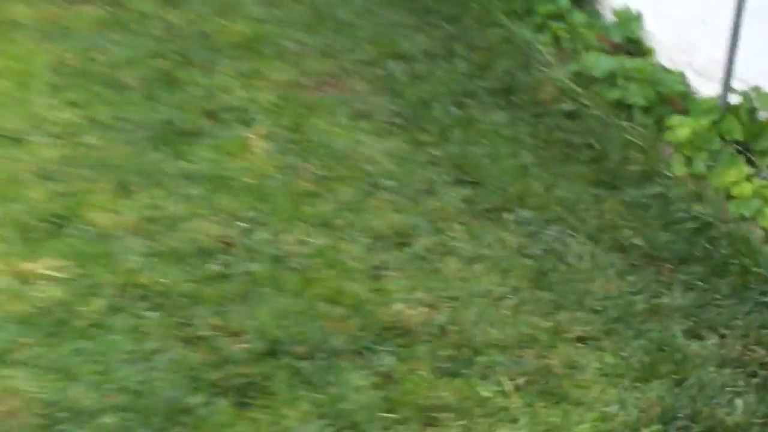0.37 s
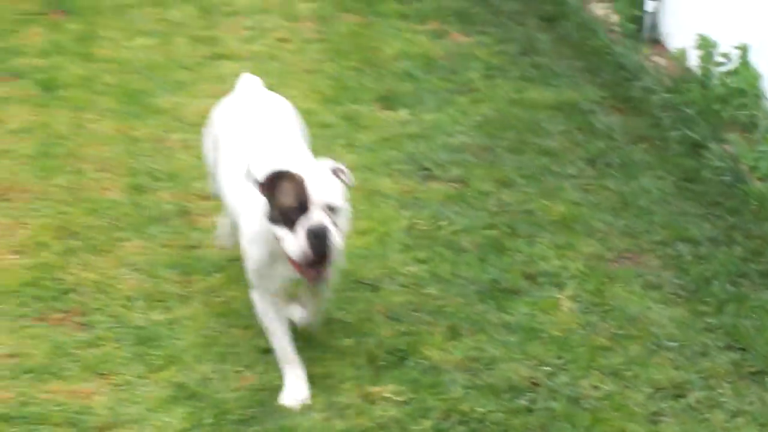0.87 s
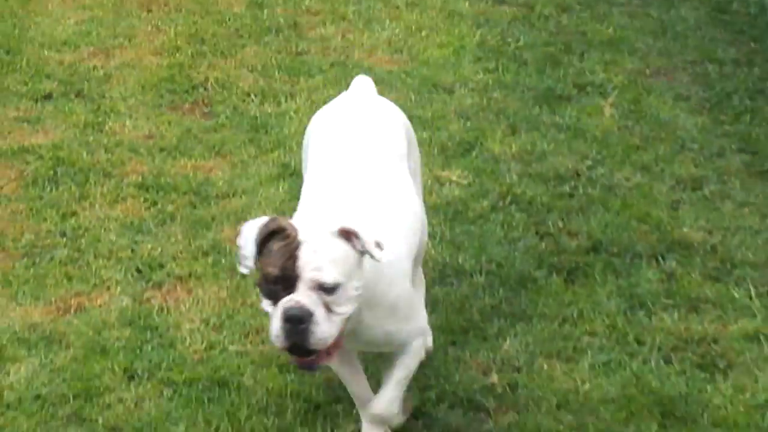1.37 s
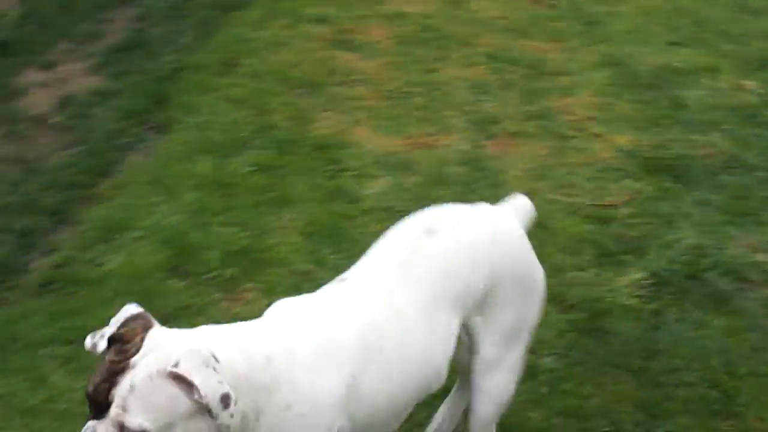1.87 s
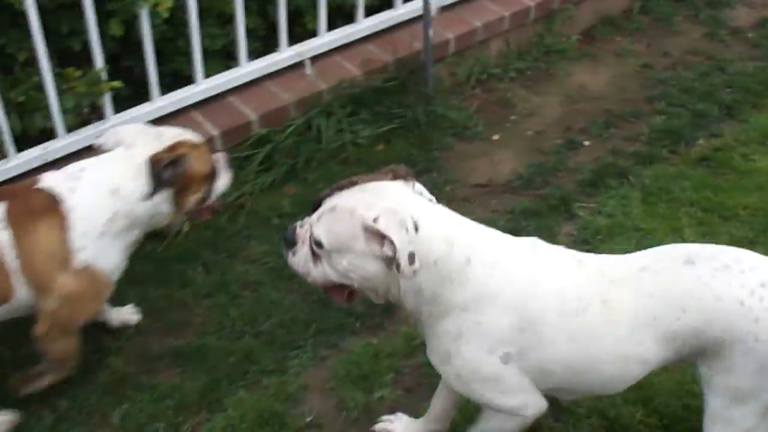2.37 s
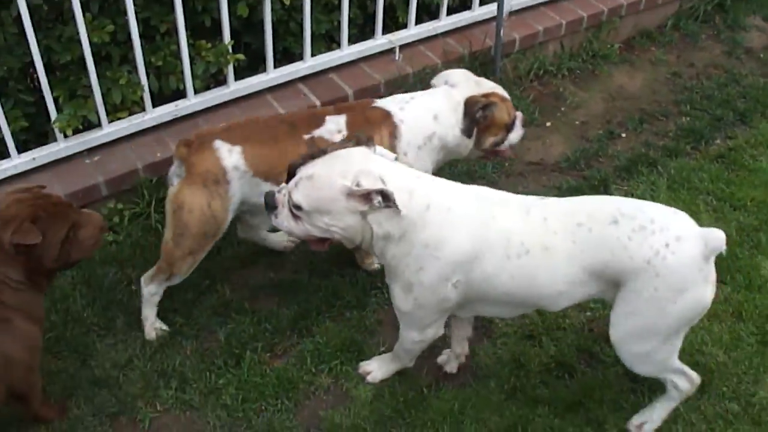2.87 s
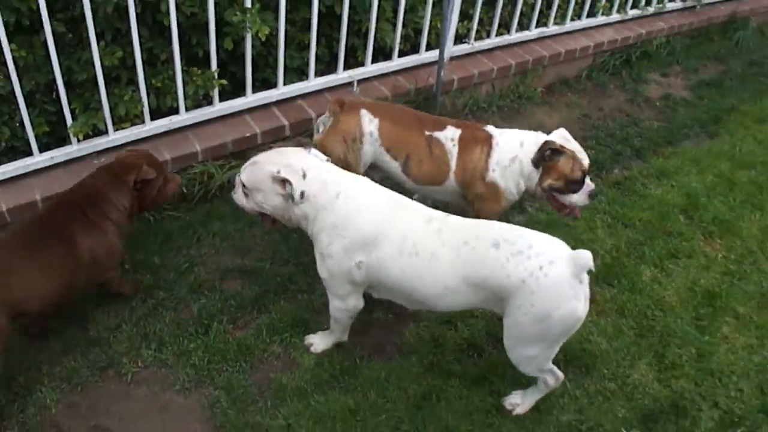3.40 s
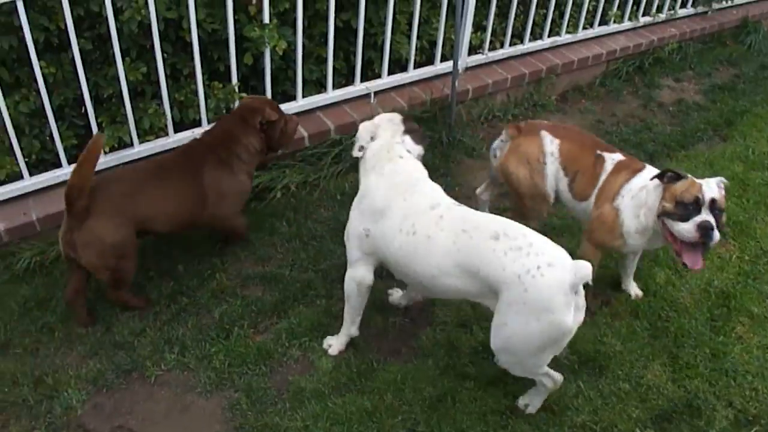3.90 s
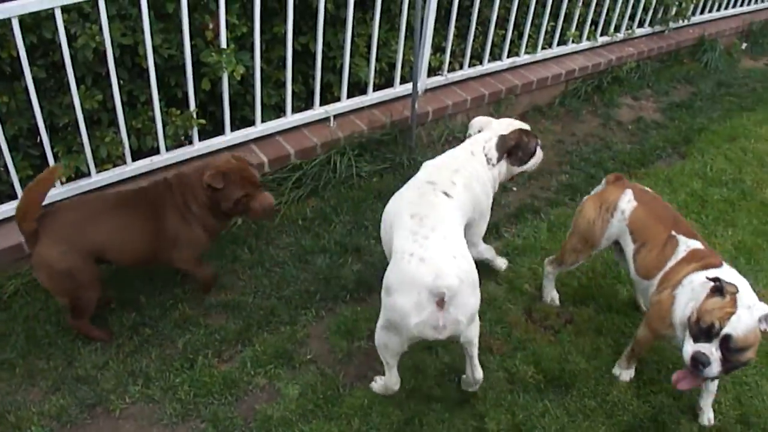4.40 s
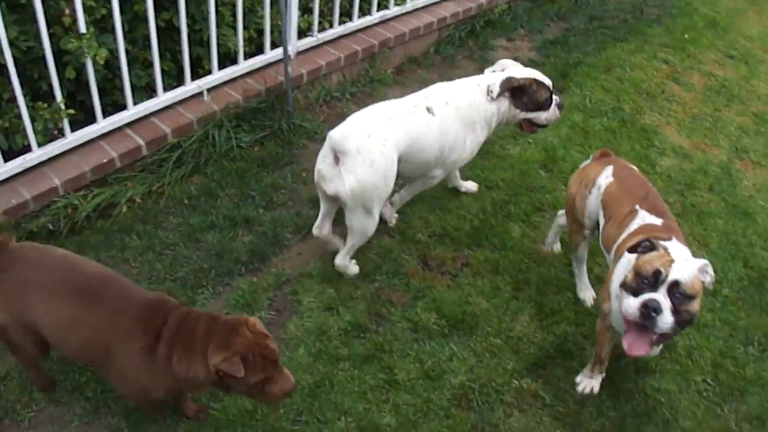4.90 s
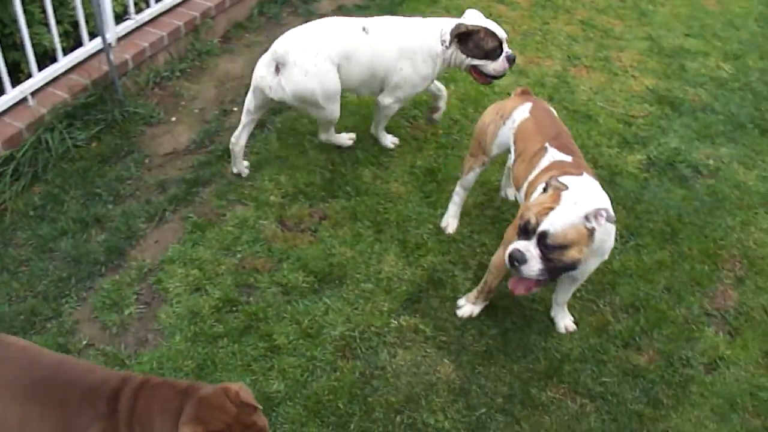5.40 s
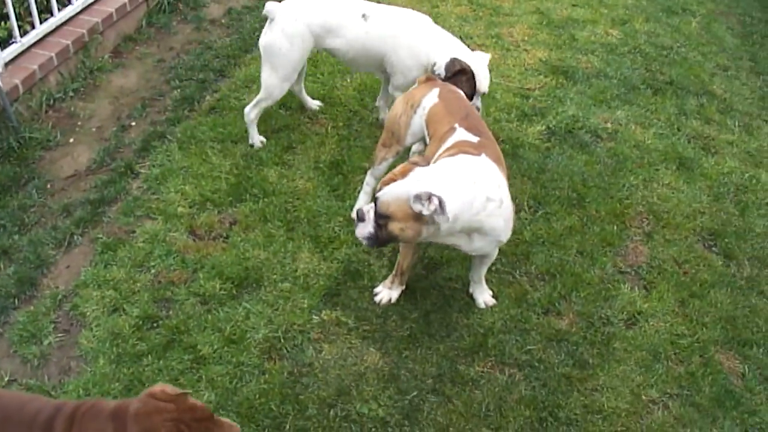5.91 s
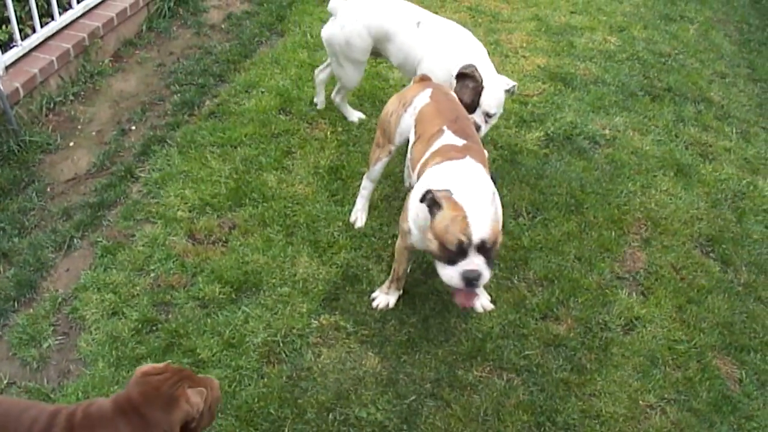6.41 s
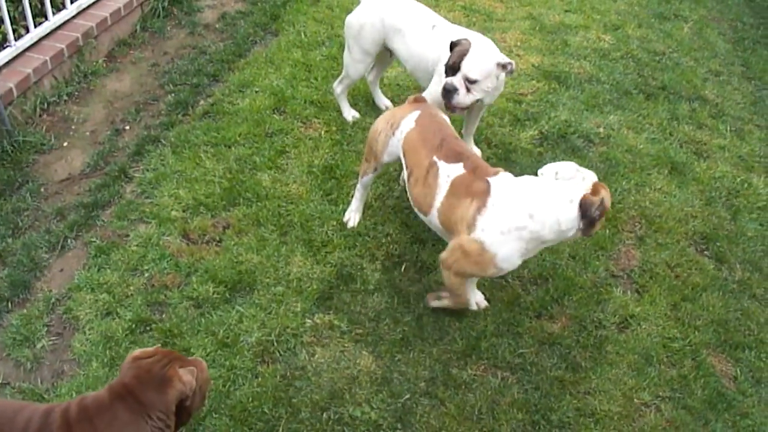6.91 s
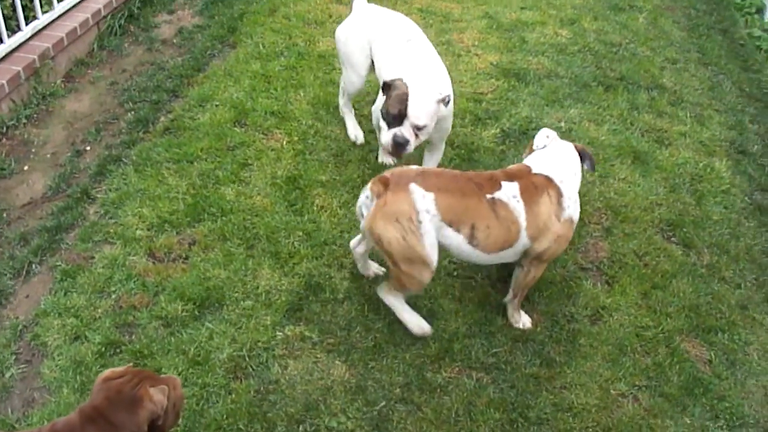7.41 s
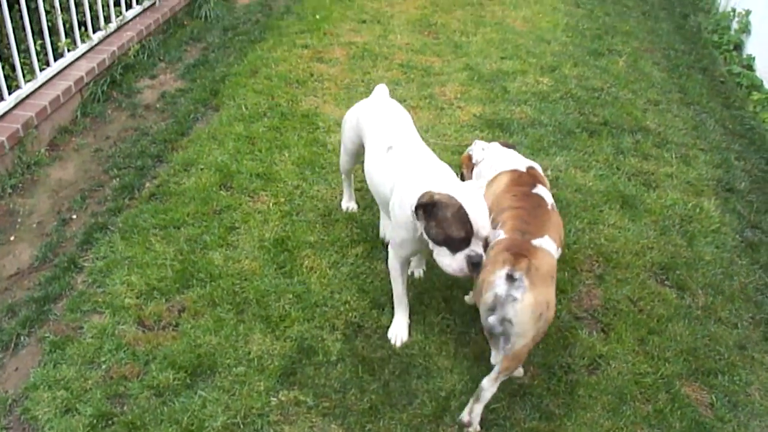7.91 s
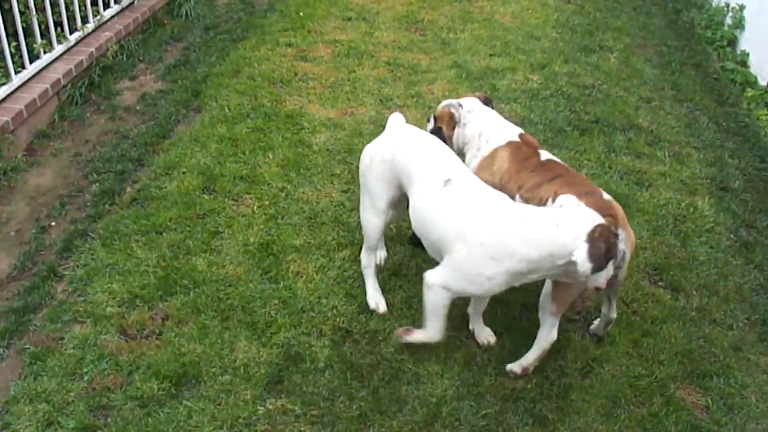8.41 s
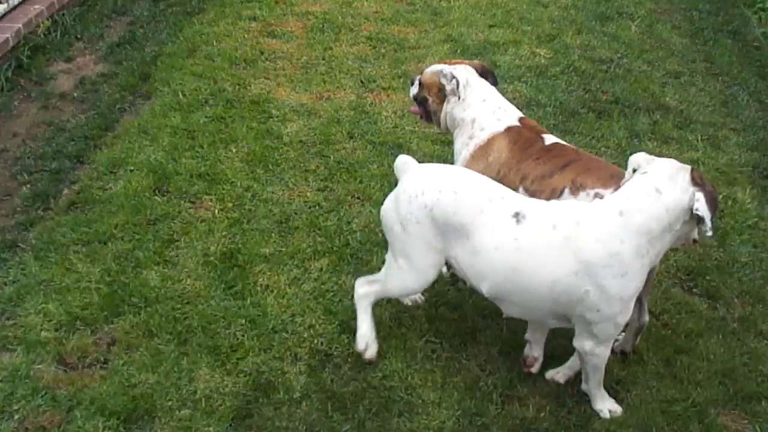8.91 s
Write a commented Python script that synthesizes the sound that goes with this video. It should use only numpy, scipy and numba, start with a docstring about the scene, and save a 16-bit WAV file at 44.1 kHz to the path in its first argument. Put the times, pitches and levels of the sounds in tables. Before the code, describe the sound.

On a backyard lawn, a small camera's microphone hears mostly its own handling. From 0 to 0.35 s, rapid bright focus ticks mix with skin rubs and bumps; a hard tap and thump land near 0.42. At 0.36 the zoom motor lurches in with a bending whine, settling into a rough, pulsing grind until 4.17. Irregular thumps punctuate it, densest around 2.6-3.1. Scrapes and taps at 4.2-4.4 follow its stop. Faint steady hiss and fast ticking with dull knocks remain until 6.8, while dogs pant a few metres away in short raspy puffs, mainly 4.3-5.5 and again at 6.5. Isolated bumps fall near 4.8 and 5.7. A very faint high whirr spans 6.8-7.5, then sharp taps, rubs and heavy bumps cluster at 7.5-8.0. The motor restarts at 8.05 and grinds to the 9-second end. Loud hits briefly duck the background.

```python
"""First a faint outdoor hiss, skin rubbing a small hand-held camera and its focus drive ticking once a field.
Fingers bump and tap the case, and a zoom motor runs twice: steps slap its gears, which grind and whine.
Later, dogs on a lawn pant a few metres off: shaped noise that swells and dies with each breath.
Bumps are short pushes on the diaphragm, taps are ringing modes, rubs are stuttering noise.
A limiter ducks all of it after each loud peak."""
import sys
import numpy as np
from scipy import signal
from scipy.fft import rfft, irfft
from scipy.io import wavfile
from scipy.ndimage import uniform_filter1d
from numba import njit

SR = 44100
rng = np.random.default_rng(int(sys.argv[2]) if len(sys.argv) > 2 else 0)


def generate_wav(sig):
    """Save sig (samples, or channels by samples) to the path in sys.argv[1] as 16-bit PCM at SR."""
    pcm = np.round(np.clip(np.atleast_2d(sig).T, -1, 1) * 32767).astype(np.int16)
    wavfile.write(sys.argv[1], SR, pcm)


def attenuation_scalar(level_db):
    """Turn a level in dB into a linear amplitude multiplier (20 dB per decade)."""
    decades = np.asarray(level_db, float) / 20
    return 10 ** decades


N = 398223
T = np.arange(N) / SR
FIELD_HZ = 59.94  # picture fields per second; they pace the focus drive


def unit(x):
    """Scale to rms 1."""
    return x / np.sqrt(np.mean(x ** 2))


def noise():
    """White noise of rms 1."""
    return rng.standard_normal(N)


def colour(x, points):
    """Causal (minimum-phase) filter whose gain follows (frequency [Hz], gain [dB]) points."""
    hz, db = np.transpose(points)
    grid_hz = np.arange(2049) * SR / 4096
    gain_db = np.interp(np.log(grid_hz + 1), np.log(hz), db)
    cepstrum = irfft(gain_db * np.log(10) / 20)
    # folding the cepstrum forward in time makes the filter causal
    cepstrum[1:2048] *= 2
    cepstrum[2049:] = 0
    return signal.fftconvolve(x, irfft(np.exp(rfft(cepstrum))))[:len(x)]


def ring(x, modes):
    """Decaying sine modes struck by x, each falling 60 dB in its own time."""
    t = T[:4096]
    response = sum(attenuation_scalar(db) * np.sin(2 * np.pi * hz * t) * .001 ** (t / t60) for hz, db, t60 in modes)
    return signal.fftconvolve(x, response)[:N]


def blows(times, sizes):
    """Single-sample blows."""
    return np.bincount(np.clip((times * SR).astype(int), 0, N - 1), sizes, N)


def walk(rate):
    """Smooth chance that turns about rate times a second, spread 1."""
    k = int(SR / rate)
    once = uniform_filter1d(noise(), k, mode="wrap")
    return unit(uniform_filter1d(once, k, mode="wrap"))


def tone(hz):
    """Sine of rms 1 on a moving pitch."""
    return np.sqrt(2) * np.sin(2 * np.pi * np.cumsum(hz) / SR)


def burst(x, seconds):
    """Every blow starts a tail that dies away exponentially."""
    return signal.lfilter([1], [1, -np.exp(-1 / (seconds * SR))], x)


def cut(x, hz, kind):
    """Steep filter: "low" keeps what lies below hz, "high" what lies above."""
    return signal.sosfilt(signal.butter(4, hz, kind, fs=SR, output="sos"), x)


def span(start, stop):
    """A gate that is open from start to stop, with edges smoothed over 90 samples."""
    return uniform_filter1d(1. * ((T >= start) & (T <= stop)), size=90)


# tone colour of the steady hiss: (frequency [Hz], gain [dB])
AIR_COLOUR = [(20, 1), (70, 3.5), (360, -5), (760, -8.5), (1040, -4), (1340, -0.5), (1550, 4), (1960, -0.5),
              (3200, -13.5), (4000, -12), (4600, -16), (7400, -30.5), (11000, -54.5)]


def air():
    """Steady hiss of air and electronics: shaped noise."""
    return attenuation_scalar(-47.5) * unit(colour(noise(), AIR_COLOUR))


# low handling rumble before its wandering is added: (time [s], level [dB])
RUMBLE_LEVEL = [(0, -61), (4.3, -56.5), (5, -66), (7.9, -64), (8.4, -74)]


def handling_rumble():
    """Low handling rumble: deep noise whose level wanders, louder while the hand moves."""
    level_db = np.interp(T, *np.transpose(RUMBLE_LEVEL)) + 6.7 * walk(13.4)
    deep = colour(noise(), [(20, -16.5), (60, 2), (130, -6.5), (300, -35), (1500, -120)])
    return attenuation_scalar(level_db) * unit(deep)


# skin slides on the case: (start [s], hardest press [s], stop [s])
RUB_TIMES = [(0, .04, .09), (.13, .185, .197), (.355, .375, .41), (.42, .43, .49), (2.625, 2.695, 2.725),
             (2.74, 2.79, 2.86), (4.2, 4.262, 4.3), (4.305, 4.322, 4.336), (6.63, 6.67, 6.72),
             (6.75, 6.83, 6.86), (7.57, 7.595, 7.612), (7.614, 7.632, 7.642), (7.826, 7.85, 7.892)]
# how each slide sounds at its hardest: (level [dB], treble against body [dB], low crackle against body [dB])
RUB_LEVELS = [(-33.5, -21, -25), (-25, -3, -2.5), (-20, -29, -2), (-20.5, -23, -2), (-41, -27, 21),
              (-39.5, -31, 20), (-25, -19.5, -1.5), (-18, -34, -3), (-44, 2, 2.5), (-42.5, 2.5, 3),
              (-39, -15, -0.5), (-18.5, 0.5, -11), (-29, -3, -7)]
# tone colour of a slide's body, treble and low crackle: (frequency [Hz], gain [dB])
RUB_BODY_COLOUR = [(400, -15), (750, 1), (1150, 2), (1650, 13), (2000, 6), (2600, -3.5), (3800, -8),
                   (5000, -23), (8000, -71)]
TREBLE_COLOUR = [(1800, -48), (2400, 1), (4200, -1), (6000, -11.5), (9200, -28), (11000, -32)]
RUB_LOW_COLOUR = [(40, -5.5), (150, 6), (500, 7), (800, -1), (1300, -15), (4000, -100)]


def rubs():
    """Skin stutters along the case: gritty noise that grows with the press of the finger."""
    touch_db, lift_db, trail_db = -14, -6, -11.5  # softer at both ends, then a faint trail
    trail_s = .025
    grit = attenuation_scalar(3.0 * walk(400) + 1.5 * walk(60))
    body = unit(colour(noise() * grit, RUB_BODY_COLOUR))
    treble = unit(colour(noise() * grit, TREBLE_COLOUR))
    crackle = attenuation_scalar(1.5 * walk(130) + 1.9 * walk(50))
    low = unit(colour(noise() * crackle, RUB_LOW_COLOUR))
    out = np.zeros(N)
    for (start, peak, stop), (db, treble_db, low_db) in zip(RUB_TIMES, RUB_LEVELS):
        press_s = [start, peak, stop, stop + trail_s / 5, stop + trail_s]
        press_db = np.interp(T, press_s, [touch_db, 0, lift_db, trail_db, 2 * trail_db])
        skin = body + attenuation_scalar(treble_db) * treble + attenuation_scalar(low_db) * low
        out += span(start, stop + trail_s) * attenuation_scalar(db + press_db) * skin
    return out


# the focus drive hunts back and forth: (start [s], stop [s], blow level [dB], extra as it sets off [dB])
HUNTS = [(0, .34, -26.5, -14), (4.383, 6.837, -33.5, 1), (7.52, 8.05, -33, 9.5)]
# ringing of a bright tick and of a dull knock: (frequency [Hz], level [dB], time to fall 60 dB [s])
TICK_RING = [(3992, -9, 0.034), (4364, -4.5, 0.016), (5120, 2.5, 0.0049), (5450, -6.5, 0.0065),
             (6300, -15, 0.0045), (1800, -2, 0.02)]
KNOCK_RING = [(371, 1.5, 0.046), (1023, -16, 0.026), (1465, 10.5, 0.012)]
TRAVEL_START_S, TRAVEL_STOP_S = 6.81, 7.53  # the drive's long fast travel; the idle ticks pause


def focus_ticks():
    """A bright tick each field, every second one harder; in the long hunt those bring a dull knock."""
    first_tick_s, knock_lag_s, set_off_s = .0052, .005, 0.14
    idle_db, knock_db = -46.5, -44.5
    times = first_tick_s + np.arange(int(N / SR * FIELD_HZ)) / FIELD_HZ
    tick_chance, knock_chance, time_chance = rng.standard_normal((len(times), 3)).T
    hard = np.arange(len(times)) % 2
    force = attenuation_scalar(idle_db) * ((times < TRAVEL_START_S) | (times > TRAVEL_STOP_S))
    for start, stop, db, extra_db in HUNTS:
        setting_off = np.exp(-np.abs(times - start) / set_off_s)
        force = force + ((times >= start) & (times <= stop)) * attenuation_scalar(db + extra_db * setting_off)
    sizes = force * attenuation_scalar(-3.5 * (3.0 - hard) + 2.5 * tick_chance)
    ticks = blows(times + .00008 * time_chance, sizes)
    # a short rattle, then the drive rustles on until the next field
    rattle = (.3 * burst(ticks, .0004) + .03 * burst(ticks, .012)) * noise()
    bright = ring(cut(ticks + rattle, 5780, "low"), TICK_RING)
    knock_times = times + knock_lag_s * (1 + 0.059 * time_chance)
    knocks = span(4.42, 6.8) * attenuation_scalar(knock_db) * blows(knock_times, hard * attenuation_scalar(4.2 * knock_chance))
    return bright + ring(cut(knocks, 2400, "low"), KNOCK_RING)


# fingers bump the case: (time [s], level [dB], width of the main push [ms], direction [+1 or -1])
BUMP_EVENTS = [(0.0192, -16.5, 4.1, -1.0), (0.079, -15.5, 3.7, -1.0), (0.187, -7.5, 1.43, 1.0),
               (0.4327, -3, 1.3, 1.0), (0.7735, -13, 4.9, -1.0), (1.0046, -20, 1.1, 1.0),
               (1.087, -15.5, 1.04, 1.0), (1.286, -8, 2.4, 1.0), (1.3233, -12.5, 4.4, 1.0),
               (1.5283, -6.5, 2.2, 1.0), (1.695, -14, 2.24, 1.0), (1.792, -23, 2, -1.0),
               (1.8143, -21, 2.7, -1.0), (1.9307, -17.5, 1.8, -1.0), (1.9798, -20, 1.8, 1.0),
               (2.0077, -21, 1.6, 1.0), (2.0599, -16.5, 1.4, 1.0), (2.154, -15.5, 1.8, 1.0),
               (2.604, -15.5, 3.7, -1.0), (2.621, -7, 1.35, -1.0), (2.646, -4, 4.2, -1.0),
               (2.8804, -7, 2.55, -1.0), (2.9338, -8.5, 3.3, -1.0), (2.9612, -15, 2.7, 1.0),
               (3.007, -11.5, 3.1, -1.0), (3.0294, -8.5, 3.05, -1.0), (3.054, -6.5, 2.8, -1.0),
               (3.2113, -19, 1.8, -1.0), (3.2977, -26, 5, -1.0), (3.4577, -10.5, 3.6, -1.0),
               (3.512, -20.5, 2.3, -1.0), (3.6913, -24, 4.2, -1.0), (3.748, -22, 3.6, -1.0),
               (3.7665, -13.5, 2.95, -1.0), (3.8097, -25, 3, -1.0), (3.9315, -12, 2.9, -1.0),
               (4.0384, -13, 3.5, -1.0), (4.4065, -20, 5.3, 1.0), (4.8267, -10, 2.6, 1.0),
               (4.8873, -17, 3.5, 1.0), (5.7257, -7.5, 2.1, 1.0), (6.511, -19.5, 2.9, 1.0),
               (6.5184, -15.5, 2.6, 1.0), (6.8438, -18, 1.6, -1.0), (6.974, -39, 3, 1.0),
               (7.361, -32, 4, 1.0), (7.658, -7.5, 3, -1.0), (7.5196, -22.5, 3.8, -1.0),
               (7.698, -7, 2.6, -1.0), (7.8918, -15.5, 1.77, -1.0), (7.923, -22.5, 5.1, 1.0),
               (7.9678, -12.5, 2.8, 1.0), (7.9908, -14, 4.5, 1.0), (8.021, -25, 4.0, 1.0),
               (8.0716, -24, 5.2, 1.0), (8.59, -20.5, 1.45, -1.0)]


def bumps():
    """Each bump pushes the diaphragm and lets it swing back."""
    out = np.zeros(N)
    for s, db, ms, way in BUMP_EVENTS:
        at = np.flatnonzero(np.abs(T - s) < ms / 200)
        u = (T[at] - s) * 2000 / ms  # time in half widths
        swing = (1 - u ** 2) * np.exp(-u ** 2 / 2)
        # the contact itself: steep rise, slower fall
        tip = np.clip(1 - np.abs(u) / np.where(u < 0, .4, .9), 0, 1)
        out[at] += np.sign(way) * attenuation_scalar(db) * (0.56 * swing + 0.54 * tip)
    return out


# taps and creaks of the case: (time [s], blow level [dB], treble against the blow [dB])
TAP_EVENTS = [(0.0997, -35.5, 16), (0.1165, -17.5, -35), (0.186, -16.5, -4), (0.3557, -15, -100),
              (0.4156, -4.5, -25), (0.9194, -24, -21), (1.529, -24.5, -28), (1.5905, -31, -29),
              (2.6173, -20, -46), (4.2435, -20.5, -23), (4.291, -15.5, -20), (4.3203, -10, -27),
              (4.367, -30, -13), (4.393, -32, -12), (5.139, -30.5, -14), (5.3197, -31, -2), (6.828, -33, 3),
              (7.5281, -32, 8), (7.5913, -36, -21), (7.621, -19, -15), (7.636, -3, -1), (7.728, -29, -1),
              (7.768, -31.5, 6.5), (7.793, -33.5, 8), (7.8495, -29.5, -52), (7.9702, -17, -12),
              (8.0463, -25, -18), (8.545, -23.5, -17)]
# ringing of the case and of a tap's bright part: (frequency [Hz], level [dB], time to fall 60 dB [s])
TAP_RING = [(1593, 6.5, 0.0094), (1750, -24, 0.0044), (1188, -9, 0.011), (695, -22, 0.06)]
SNAP_RING = [(2750, -3.5, 0.016)]


def taps():
    """Short blows ring the case; a bright mode and a snap of noise add the treble."""
    s, db, treble_db = np.transpose(TAP_EVENTS)
    case_ring = ring(cut(blows(s, attenuation_scalar(db)), 2730, "low"), TAP_RING)
    bright_blows = blows(s, attenuation_scalar(db + treble_db))
    snap = burst(bright_blows, 0.00088) * noise()
    filter_gain = np.std(colour(noise(), TREBLE_COLOUR))
    return case_ring + ring(bright_blows, SNAP_RING) + 1.96 * colour(snap, TREBLE_COLOUR) / filter_gain


# the focus drive sings while it travels: (start [s], length [fields], pitch [Hz], level [dB])
FOCUS_BEEPS = [(.272, 1.1, 5700, -58), (.307, 1.2, 5800, -59), (5.08, 1.2, 3820, -52),
               (5.155, 2.3, 3800, -56), (5.778, 1.2, 4400, -56), (6.362, 1.1, 5750, -52),
               (6.378, 1.1, 4750, -56), (6.412, 1, 3760, -58), (6.428, 1.1, 5760, -53),
               (6.762, 1.3, 5840, -55), (6.795, 0.99, 3900, -46), (7.563, 1.1, 4800, -56)]
# one longer buzz with overtones: (start [s], stop [s], base pitch [Hz])
FOCUS_BUZZ = (7.642, 7.693, 748)
# the long fast travel: (base pitch [Hz], pitch spread [Hz], middle level [dB])
FAST_TRAVEL = (8050, 1250, -69.5)


def focus_tones():
    """Thin tones of the travelling drive: steady beeps, a fast high travel and a fading buzz."""
    flutter = attenuation_scalar(1.6 * walk(300))
    out = np.zeros(N)
    for s, fields, hz, db in FOCUS_BEEPS:
        out += span(s, s + fields / FIELD_HZ) * attenuation_scalar(db) * flutter * tone(np.full(N, 1. * hz))
    low_hz, spread_hz, travel_db = FAST_TRAVEL
    done = np.clip((T - TRAVEL_START_S) / (TRAVEL_STOP_S - TRAVEL_START_S), 0, 1)
    arch = np.abs(np.sin(np.pi * done)) ** .3  # fastest half way
    # the speed sags once every two fields and wanders besides
    swing = .6 + .35 * np.sin(np.pi * FIELD_HZ * T + 2.6) + .1 * walk(90)
    size = attenuation_scalar(travel_db + 3.0 * walk(60)) * walk(500)
    out += span(TRAVEL_START_S, TRAVEL_STOP_S) * size * tone(low_hz + spread_hz * arch * swing)
    start, stop, base_hz = FOCUS_BUZZ
    fade_db = 260 * np.abs(T - start)  # 260 dB per second
    for multiple, db in zip([2., 3., 4., 5.], [-30, -37, -33, -28]):
        out += span(start, stop) * attenuation_scalar(db - fade_db) * flutter * tone(np.full(N, multiple * base_hz))
    return out


# zoom motor runs: (start [s], stop [s], level [dB], extra while it starts [dB])
ZOOM_RUNS = [(.356, 4.17, -35.5, 7.5), (8.047, 9.03, -34, 9.5)]
# tone colour, one list for each run: (frequency [Hz], gain [dB])
ZOOM_COLOURS = [
    [(50, -11.5), (100, -5.5), (900, -7), (1090, -15), (1650, -3.5), (2300, -17), (3500, -20),
     (4200, -36.5), (5750, -40), (7000, -53.5), (8000, -82)],
    [(50, -21), (170, -16), (300, -7.5), (630, -0.5), (1200, -10), (1700, -0.5), (2440, -16), (3800, -21),
     (4500, -35.5), (7000, -47), (9000, -94)],
]


def zoom():
    """Each motor step slaps the gear train, strong and weak in turn, with a puff of grinding behind it."""
    step_hz, start_sag_hz, settle_s = 179, 24.08, .09
    weak_dbs, grind_dbs = [-3.5, -2], [0, -2.5]  # for each run: every second step; gear noise
    out = 0
    for (start, stop, db, start_db), points, weak_db, grind_db in zip(
            ZOOM_RUNS, ZOOM_COLOURS, weak_dbs, grind_dbs):
        fresh = np.exp(-np.clip(T - start, 0, None) / settle_s)
        hz = (step_hz - start_sag_hz * fresh) * (1 + .02 * walk(4) + .018 * walk(25))
        at = np.flatnonzero(np.diff(np.floor(np.cumsum(hz) / SR)))
        time_chance, size_chance = rng.standard_normal((len(at), 2)).T
        sizes = attenuation_scalar(weak_db * (np.arange(len(at)) % 2) + 1.5 * size_chance)
        steps = blows(at / SR + .00006 * time_chance, sizes)
        slap = cut(unit(steps), 1154, "high")  # too light a blow to move the whole case
        grind = unit((burst(steps, .0025) + .45) * noise())
        motor = unit(colour(slap + attenuation_scalar(grind_db) * grind, points))
        out = out + span(start, stop) * attenuation_scalar(db + start_db * fresh) * motor
    return out


# gear whine on multiples of the shaft:
# (onset [s], multiple, starting level [dB], fade [dB per s], level of an added steady part [dB])
GEAR_WHINE = [(0.359, 3, -12.5, 102, -75), (.425, 2, -28.5, 43, -71), (3.1, 7.3, -50, 0, -52),
              (8.087, 2, -32, 1, -54.5), (8.095, 5, -31, 82, -68), (8.2, 7, -37, 5, -46)]
# the gear train lurches, holds, then settles under load, before waver and flutter:
# (time after the motor starts [s], shaft speed [Hz], whine gain [dB])
SHAFT_COURSE = [(0, 204.1, -13), (.016, 214.8, -3), (0.031, 268, 5), (.055, 200.3, -8.5), (.08, 175, -2.5),
                (.142, 164, -2.5), (.19, 121, -19), (.33, 90, -41)]


def whine():
    """Gears sing at multiples of the shaft speed, so their tones bend as the motor starts."""
    flutter = attenuation_scalar(2.0 * walk(30) + 1.06 * walk(180))
    waver = 1 + .012 * walk(29.2)
    s, shaft_points, gain_points = np.transpose(SHAFT_COURSE)
    out = np.zeros(N)
    for start, stop, _, _ in ZOOM_RUNS:
        shaft_hz = np.interp(T - start, s, shaft_points)
        whine_db = np.interp(T - start, s, gain_points)
        for onset, multiple, db, fade_db, held_db in GEAR_WHINE:
            if start <= onset < stop:
                size = attenuation_scalar(db + whine_db - fade_db * np.abs(T - onset)) + attenuation_scalar(held_db)
                out += span(onset, stop) * size * flutter * tone(multiple * shaft_hz * waver)
    return out


# a low hum that comes and goes, before its slow flutter: (start [s], end [s], level [dB])
HUM_TIMES = [(.4, 0.68, -44.5), (0.88, 1.195, -45), (2.245, 2.543, -49), (3.199, 4.1, -59),
             (4.696, 4.853, -51.5), (4.997, 5.297, -51.5), (5.378, 5.64, -55.5), (6.657, 6.843, -52),
             (7.6, 8.0, -50), (8.224, 9.02, -55)]


def hum():
    """A low wavering tone near 150.7 Hz that swells in and out."""
    swell = sum(attenuation_scalar(db) * ((T > start) & (T < end)) for start, end, db in HUM_TIMES)
    smooth = uniform_filter1d(swell, size=3000)
    return smooth * attenuation_scalar(1.6 * walk(15)) * tone(150.7 * (1 + 0.0164 * walk(6.3)))


def thin_line():
    """One very faint high tone near 7880 Hz, heard while the zoom motor rests."""
    return span(4.2, 8.05) * attenuation_scalar(-80 + 2 * walk(60)) * tone(7880 * (1 + 0.001 * walk(27)))


# breaths of the dogs, before their rasp: (start [s], length [s], level [dB])
BREATHS = [(4.34, 0.088, -39.5), (4.505, 0.29, -46.5), (4.84, 0.1, -35), (5.044, 0.098, -42),
           (5.212, 0.11, -42), (5.355, 0.11, -31), (6.491, 0.13, -39), (6.75, 0.09, -66)]
# tone colour of the open mouths: (frequency [Hz], gain [dB])
BREATH_COLOUR = [(600, -19), (1080, 0), (1350, 0.5), (1600, 12), (2000, 12), (2300, 3.5), (2600, 2.5),
                 (3300, -10.5), (5000, -19), (8000, -84)]


def dogs():
    """Breath rushes through open mouths, a little raspy; each one swells and dies away."""
    tail_s = 0.033
    flow = np.zeros(N)
    for s, length, db in BREATHS:
        arch = np.abs(np.sin(np.pi * np.clip((T - s) / length, 0, 1))) ** 0.28
        flow += attenuation_scalar(db) * arch * span(s, s + length)
    flow = np.maximum(flow, burst(flow, tail_s) / (tail_s * SR))
    return flow * attenuation_scalar(1.5 * walk(90)) * unit(colour(noise(), BREATH_COLOUR))


def scene():
    """All sources at the one microphone."""
    around = air() + hum() + thin_line() + dogs()
    hands = handling_rumble() + rubs() + bumps() + taps()
    drives = focus_ticks() + focus_tones() + zoom() + whine()
    return (around + hands + drives)[None]


@njit
def limiter(x, top, lag, release):
    """Notes each peak above top, turns down a moment late and comes back slowly."""
    y, peak, gain = np.empty(len(x)), 0., 1.
    for i in range(len(x)):
        peak = max(abs(x[i]), peak * (1 - release))
        gain += (min(1., top / (peak + 1e-9)) - gain) * lag
        y[i] = x[i] * gain
    return y


# resonances of case and microphone port: (frequency [Hz], width [Hz], boost [dB])
CASE_RESONANCES = [(1675, 264, 4), (933, 110, 3), (2760, 27, 3), (3185, 34, 4.5), (3810, 120, 4.5)]


def case_and_port(x):
    """Case and microphone port lift the sound around their resonances."""
    hz = np.geomspace(20, 20000, num=600)
    lift_db = sum(db / (1 + (2 * (hz - f) / width) ** 2) for f, width, db in CASE_RESONANCES)
    return colour(cut(x, 19, "high"), np.transpose([hz, lift_db]))


def band_limit(x):
    """A steep low-pass at the top of the band."""
    return signal.sosfilt(signal.butter(12, 11270, fs=SR, output="sos"), x)


def record(dry):
    """The case lifts its resonances, the limiter ducks and rounds peaks, hiss joins, the top is cut."""
    lag_s, release_s = 0.0077, 0.056
    x = case_and_port(dry[0])
    x = limiter(x, attenuation_scalar(-14.5), 1 / (lag_s * SR), 1 / (release_s * SR))
    x = np.tanh(x) + attenuation_scalar(-66.5) * noise()  # the amplifier's own hiss
    # 50 dB down from 11556 Hz upward
    x = signal.sosfilt(signal.cheby2(12, 50, 11556, fs=SR, output="sos"), x)
    return band_limit(x[None])


dry = scene()
out = record(dry)
generate_wav(out)
```